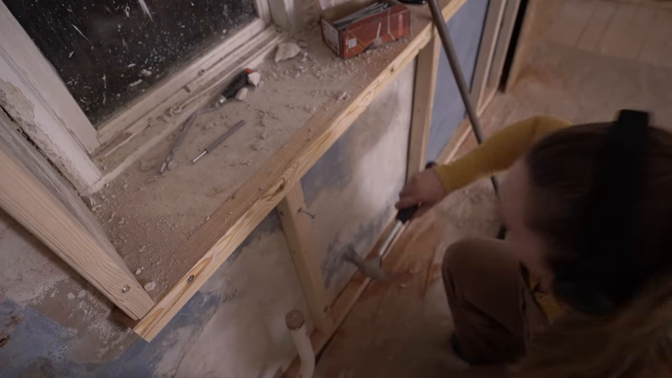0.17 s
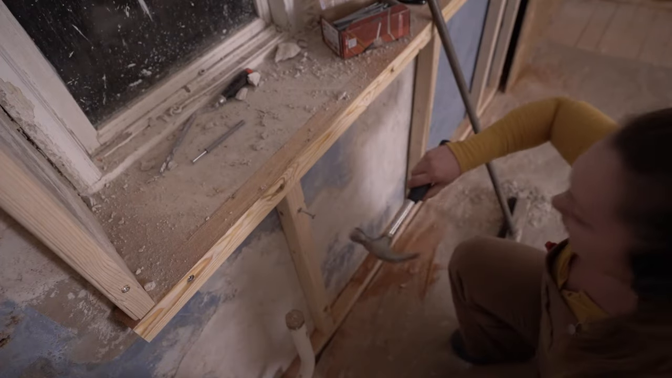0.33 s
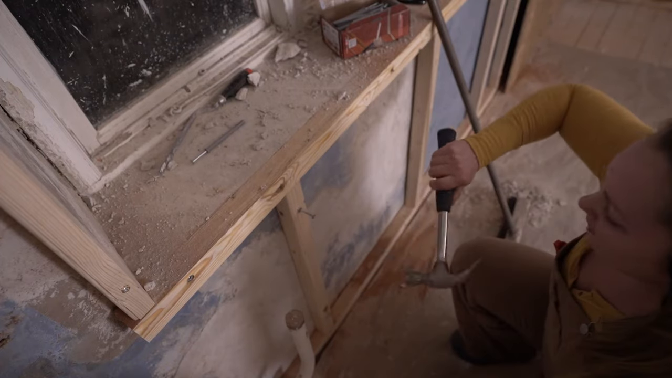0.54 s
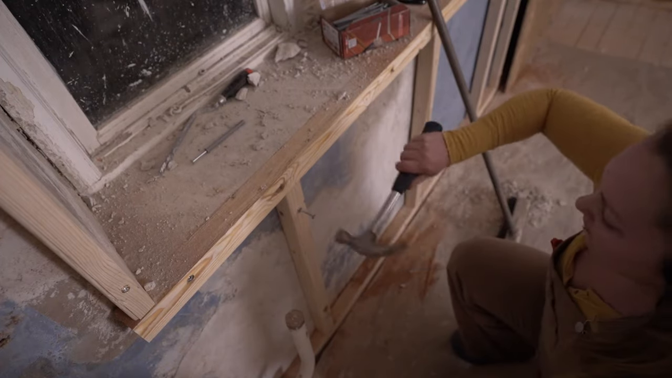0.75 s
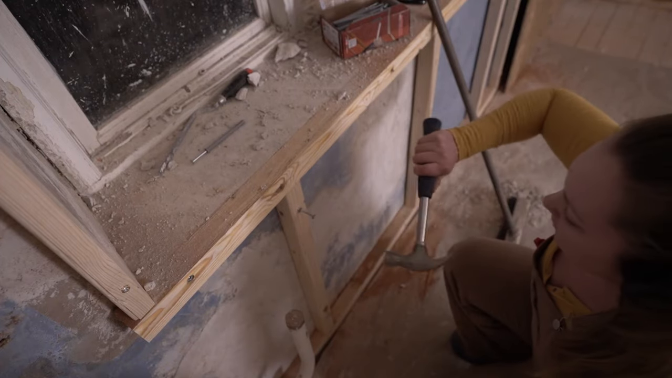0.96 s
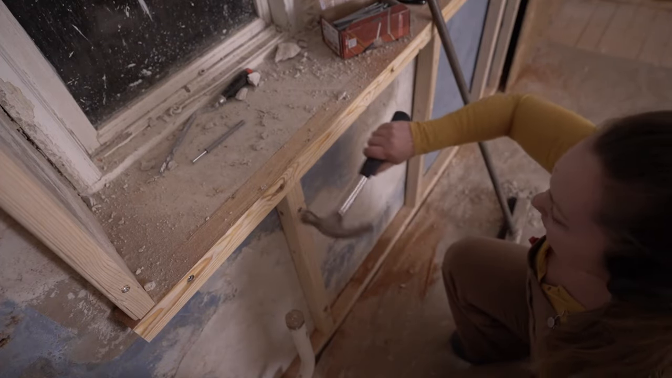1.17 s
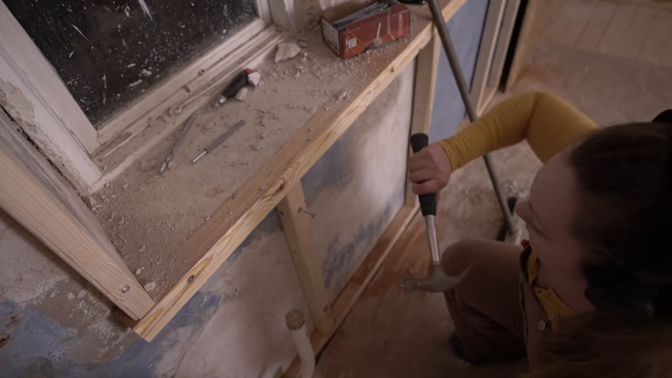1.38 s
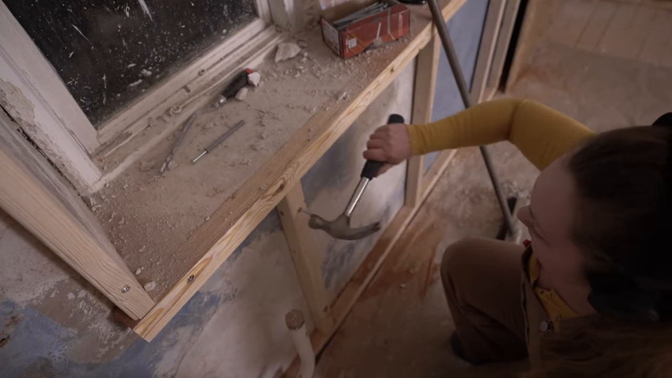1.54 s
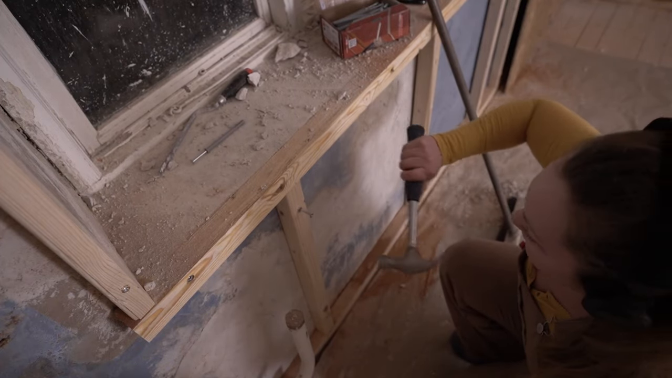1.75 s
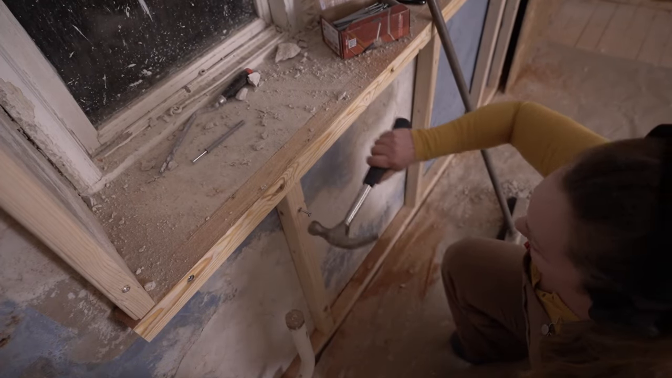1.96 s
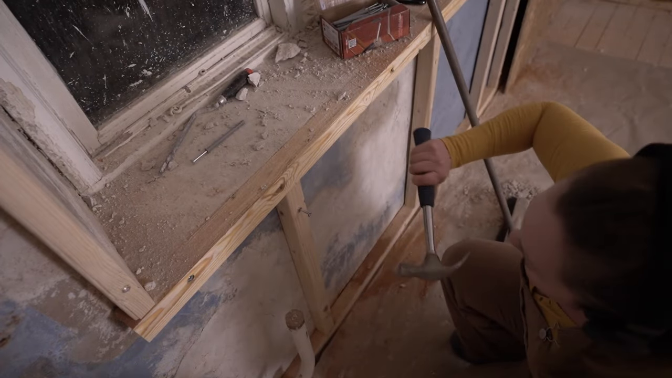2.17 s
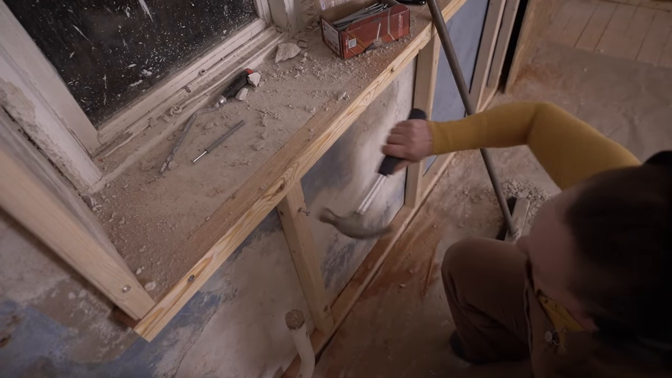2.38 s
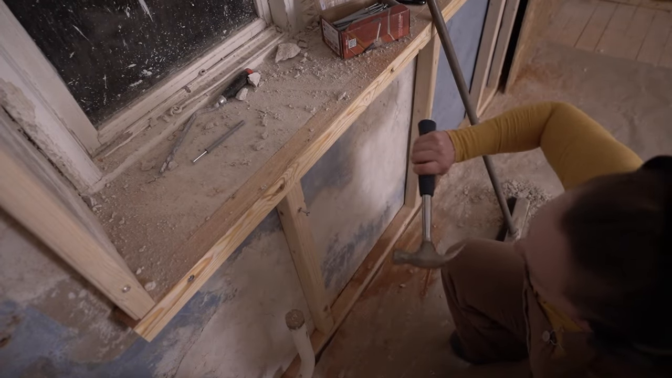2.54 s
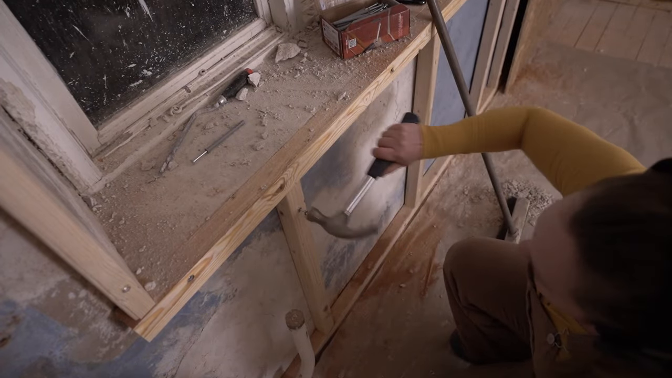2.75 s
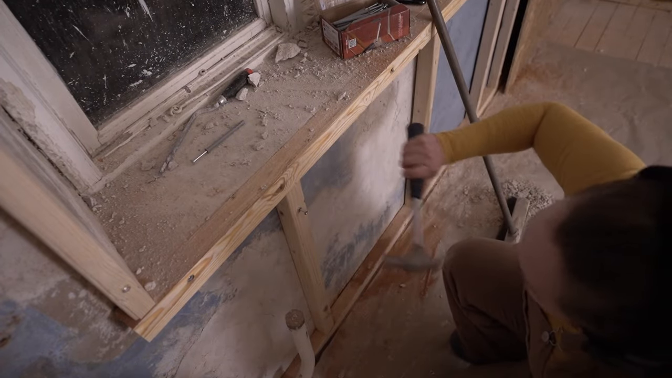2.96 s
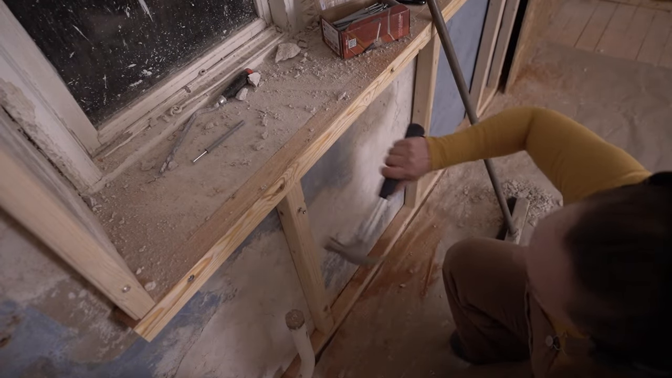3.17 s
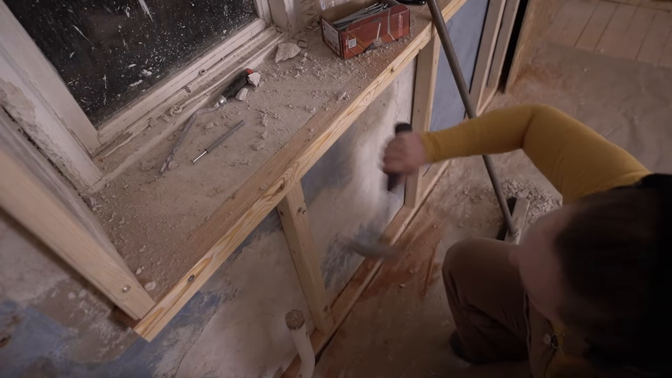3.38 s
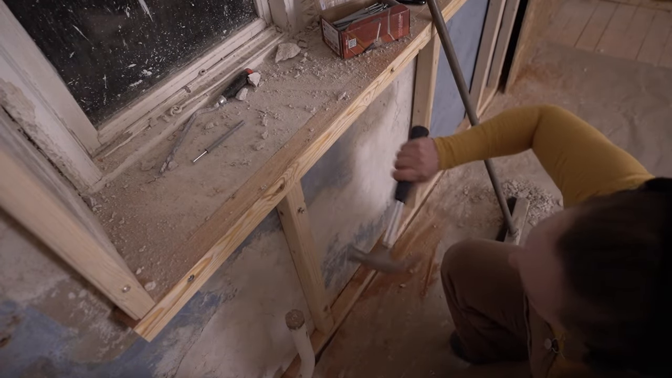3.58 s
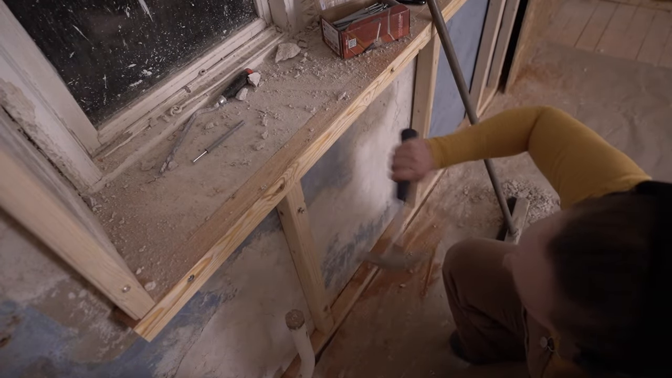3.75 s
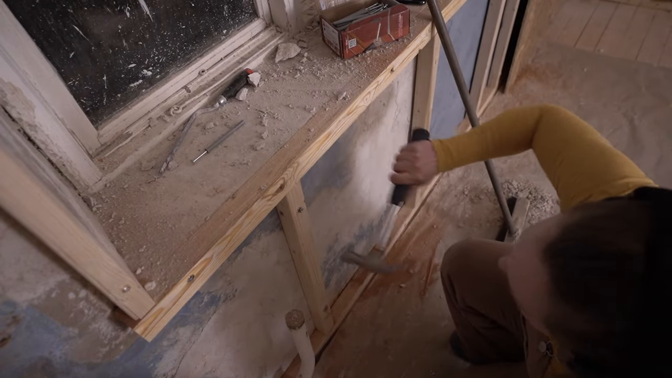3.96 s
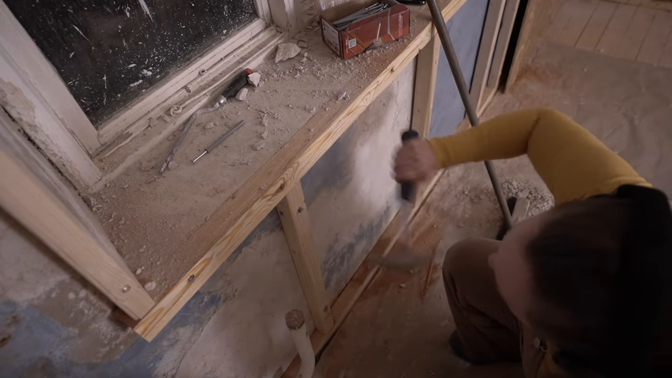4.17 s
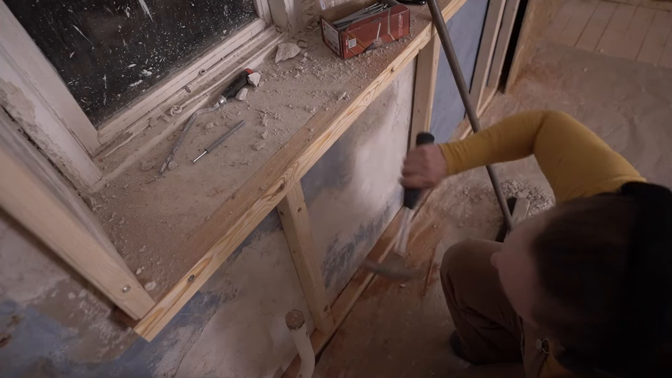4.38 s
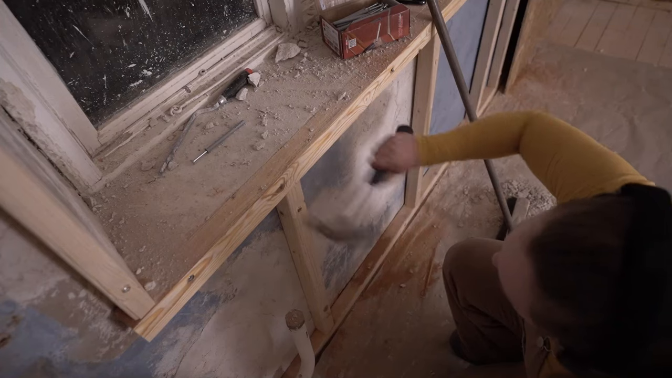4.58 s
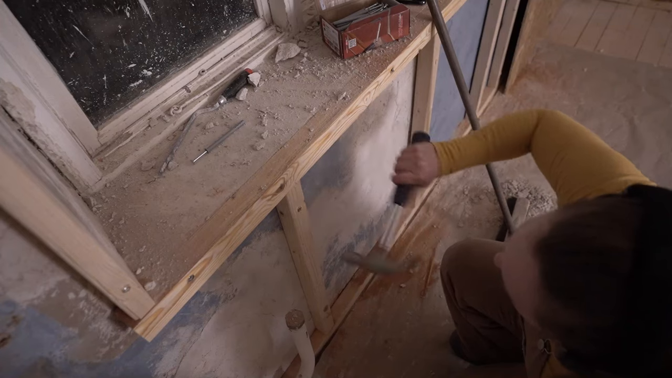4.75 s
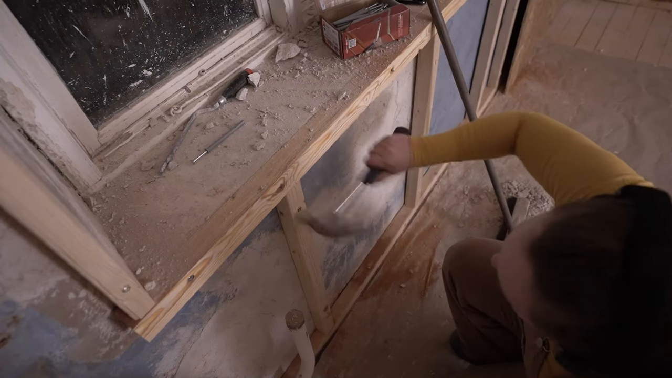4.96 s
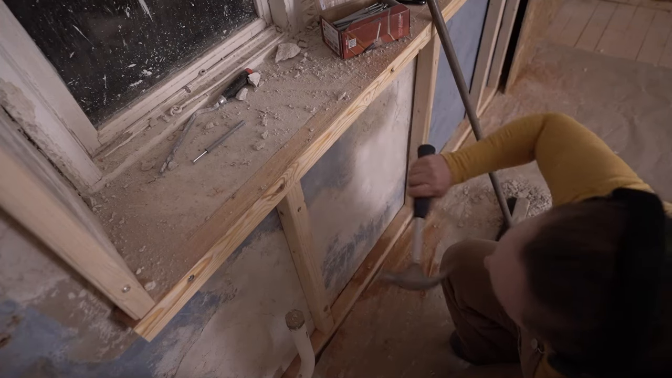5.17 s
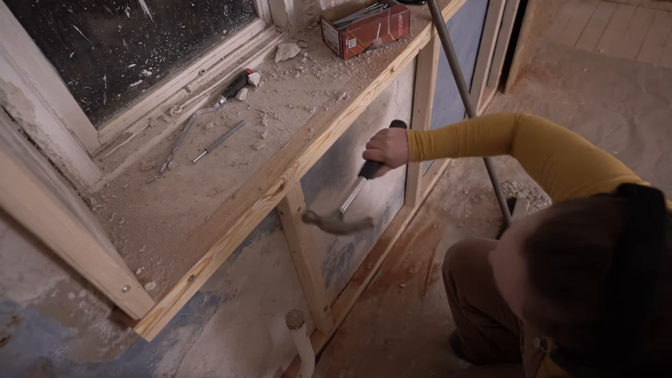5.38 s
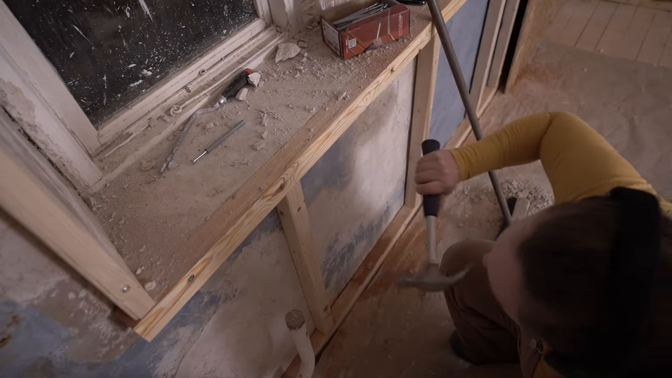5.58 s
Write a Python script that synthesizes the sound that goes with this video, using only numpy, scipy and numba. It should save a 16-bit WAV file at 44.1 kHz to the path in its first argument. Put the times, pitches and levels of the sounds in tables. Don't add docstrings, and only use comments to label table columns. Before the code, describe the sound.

One hammer on nails in a timber batten, indoors among hard walls. First quiet shifting of clothes, a tick and a low floor groan; then a quick bouncing tap and eleven regular strikes about 0.38 seconds apart. Each is a sharp knock with metallic ring and short room echo; later ones are fuller. Tiny crumbs tick between blows. Close microphone, peaks squashed, low room tone.

```python
import sys
import numpy as np
from scipy import signal
from scipy.fft import rfft, irfft, next_fast_len
from scipy.io import wavfile
from scipy.ndimage import uniform_filter1d, minimum_filter1d
from numba import njit

SR = 44100
rng = np.random.default_rng(int(sys.argv[2]) if len(sys.argv) > 2 else 0)


def file_out(sig):
    cols = np.atleast_2d(sig).T
    lim = np.clip(cols, -1, 1)
    pcm = np.round(lim * 32767).astype(np.int16)
    wavfile.write(sys.argv[1], SR, pcm)


def ratio_of_db(decibels):
    return 10 ** (np.asarray(decibels, float) / 20)


N = 247842
TAIL = 2 ** 15
T = np.arange(TAIL) / SR
DELAY_S = 0.000964
BOUNCE_S, USUAL_DB = 0.05, -17


def fade(t60, size=TAIL):
    return np.exp(-np.log(1000) * T[:size] / t60)


def ring(modes, spread=0., size=TAIL // 4):
    out = np.zeros(size)
    for hz, db, t60 in modes:
        louder, sharper = spread * rng.standard_normal(2)
        sine = np.sin(2 * np.pi * hz * (1 + 0.0017 * sharper) * T[:size])
        out += ratio_of_db(db + louder) * sine * fade(t60, size)
    return out


def curve(table, x, column=1):
    table = np.array(table)
    return np.interp(np.log(x), np.log(table[:, 0]), table[:, column])


def coloured(size, spectrum):
    n = next_fast_len(size, True)
    hz = np.maximum(np.fft.rfftfreq(n, 1 / SR), 1)
    x = irfft(rfft(rng.standard_normal(n)) * ratio_of_db(curve(spectrum, hz)), n)[:size]
    return x / x.std()


def add(bus, s, x):
    i = int(s * SR)
    bus[i:i + len(x)] += x[:N - i]


def walk(rate):
    k = int(SR / rate)
    steps = np.repeat(rng.standard_normal(N // k + 1), k)
    return 1.2 * uniform_filter1d(uniform_filter1d(steps, k), k)[:N]


# [t/s, level/dB, wood knock f/Hz, face ping level/dB against the blow, steel ring level/dB]
BLOWS = [(1.15, -25, 1582, 1.5, 8.5), (1.172, -17, 1376, -36, -9), (1.579, -23.5, 1540, -28, 11),
         (1.948, -22.5, 1333, -25, 4), (2.324, -18, 1558, -13, 11.5), (2.706, -17, 1607, -28.5, 6),
         (3.081, -18, 1633, -54, 7), (3.464, -17, 1850, -29, 7), (3.84, -17, 1385, -19, 4.5),
         (4.261, -14.5, 1607, -23.5, 12), (4.64, -10.5, 1705, -25.5, 4), (5.012, -8.5, 1773, -21, 5),
         (5.402, -8, 1352, -29, -1)]


def hammering():
    near, far = np.zeros(N), np.zeros((3, N))
    bounces = np.diff(np.array(BLOWS)[:, 0], prepend=0) < BOUNCE_S
    for (s, db, knock_hz, ping_db, steel_db), bounce in zip(BLOWS, bounces):
        direct, wet = blow(db, knock_hz, ping_db, *colour(s, db, steel_db, bounce))
        add(near, s + DELAY_S, direct)
        blend = rng.standard_normal(len(far))
        for bus, share in zip(far, blend / np.linalg.norm(blend)):
            add(bus, s + DELAY_S, share * wet)
    return near, far


# [level/dB, gain as the joint closes/dB, share of the steel's ring]
WAKE = [(4.5, -5, -0.076), (-7, 10, -0.47), (5, -0.5, .3), (0.1, 1.2, 1), (2, -1, 0.11), (-4, 4, 0),
        (7, -8, 0), (0.5, 0, .05), (1, 0, -0.16), (-4, 7, 0.071), (-2, 2, .05)]


def colour(s, db, steel_db, bounce):
    since = s - BLOWS[0][0]
    closed = since / (BLOWS[-1][0] - BLOWS[0][0])
    harder = db - USUAL_DB
    head_db = -25 + 0.98 * steel_db + 9.5 * closed
    thud_db = -24.5 + 16 * closed + 10 * (since < BOUNCE_S) - db
    splinter_db = 3.5 + 0.02 * harder
    tilt = -5.5 if bounce else 1.06 - 0.12 * harder + 0.0524 * steel_db
    boom_db = -14.5 - 15.5 * np.exp(-since / 0.71) - db
    wake_db = [base + gain * closed + share * steel_db for base, gain, share in WAKE]
    return head_db, thud_db, splinter_db, tilt, boom_db, wake_db


# [f/Hz, level/dB, t60/s]
HEAD_MODES = [(2525, -4, 0.025), (2740, -11, 0.045), (3206, 1.5, 0.12), (3350, -4.5, .04),
              (3320, -4.5, 0.049), (4360, -11, 0.026), (6650, -17, 0.012)]
# [f/Hz, level/dB, t60/s]
FACE_MODES = [(9200, 5.5, 0.015), (8570, -12, 0.028), (9500, -16.5, 0.012)]
# [f/Hz, level/dB, t60/s]
BATTEN_MODES = [(172, -13.5, .05), (219, 5.5, 0.031), (307, -2.5, 0.1), (452, 12, 0.0092), (620, -1, .03)]
# [f/Hz, level/dB, t60/s]
FLOOR_MODES = [(51.65, -7.5, .1), (63.6, -4, 0.66), (79, -4, 0.055), (111.4, -11.5, 0.18)]


def blow(db, knock_hz, ping_db, head_db, thud_db, splinter_db, tilt, boom_db, wake_db):
    knock_modes = [(knock_hz, 0, 0.045), (knock_hz * 1.22, -4, 0.035), (knock_hz * 0.91, -6, 0.04)]
    knock = ring(knock_modes, spread=1.0)
    size = len(knock)
    shock = ratio_of_db(splinter_db) * jolt(tilt, boom_db, wake_db)
    grains = rng.standard_normal(size) * fade(0.035, size)
    crack = signal.fftconvolve(shock, grains)[:size]
    ping = ratio_of_db(ping_db + 4) * ring(FACE_MODES, spread=0.7)
    click = ratio_of_db(-25.5 + min(tilt + 2, 0)) * rng.standard_normal(size) * fade(0.006, size)
    head = ratio_of_db(head_db - 8) * ring(HEAD_MODES, spread=0.87)
    thud = ratio_of_db(thud_db - 18) * ring(BATTEN_MODES, spread=0.8)
    thud += ratio_of_db(boom_db - 24) * ring(FLOOR_MODES, spread=0.8)
    push = 1 - np.exp(-T[:size] / 0.0025)
    near = push * (knock + ratio_of_db(5) * thud) + ratio_of_db(-2.5) * crack + ping + click + ratio_of_db(3) * head
    far = ratio_of_db(-17.5) * knock + ratio_of_db(21) * shock + ratio_of_db(-11.5) * ping + head + thud
    drive = ratio_of_db(db + 1)
    return drive * near, drive * far


# [f/Hz, level/dB per Hz]
CRACK = [(40, -12), (150, -5), (500, -8.5), (1000, -4), (1800, 1.5), (3000, -9), (4500, -20.5),
         (6700, -20.5), (9000, -32), (12000, -38.5), (16500, -51.5)]
# [f/Hz, half width/Hz]
PEAKS = [(1355, 70), (2200, 260), (2556, 99), (3424, 140), (5230, 190), (7600, 500), (9800, 230),
         (6260, 350), (1000, 160), (3030, 110), (12500, 1400)]
# [f/Hz, half width/Hz, share]
STEEL = [(1900, 260, 0.18), (3000, 120, -0.32), (4000, 78, -0.011), (4275, 110, 0.89), (4730, 86, -0.48),
         (6000, 39, 0.33), (6620, 110, 0.11), (8900, 600, 0.39)]


def jolt(tilt, boom_db, wake_db):
    hz = np.maximum(np.fft.rfftfreq(TAIL // 4, 1 / SR), 20)
    db = curve(CRACK, hz)
    db = db + boom_db * np.clip(np.log2(220 / hz), 0, 1)
    db = db + tilt * np.log2(np.maximum(hz / 1500, 1))
    bumps = [(f, width, lift_db) for (f, width), lift_db in zip(PEAKS, wake_db)]
    bumps += [(f, width, share * wake_db[3]) for f, width, share in STEEL]
    for f, width, lift_db in bumps:
        db = db + lift_db * np.exp(-0.5 * ((hz - f) / width) ** 2)
    cepstrum = irfft(np.log(ratio_of_db(db)))
    cepstrum[1:TAIL // 8] *= 2
    cepstrum[TAIL // 8 + 1:] = 0
    pulse = irfft(np.exp(rfft(cepstrum)))
    return pulse / np.sqrt(np.sum(pulse ** 2))


# [t/s, level/dB, f/Hz]
NAIL = [
    (1.5, -45, 824),
    (2.35, -39, 843),
    (2.7, -34, 850),
    (3.1, -37.5, 843),
    (3.85, -43, 848),
    (4.25, -59, 980),
    (4.65, -34.5, 985),
    (5.4, -31, 1002),
]


def nail():
    out = np.zeros(N)
    at, level_db, pitch_hz = np.transpose(NAIL)
    beat = 1 + 0.9 * np.cos(2 * np.pi * 21 * T)
    for s, *_ in BLOWS:
        mode = (np.interp(s, at, pitch_hz), np.interp(s, at, level_db), 0.44)
        add(out, s + DELAY_S, beat * ring([mode], size=TAIL))
    return out


# [t/s, level/dB, f/Hz, t60/s]
TICKS = [(.039, -69, 8000, 0.0037), (.146, -54, 2100, .008), (0.18, -42, 1330, 0.014),
         (.183, -43.5, 2200, 0.0055), (0.185, -50, 4000, 0.003), (.184, -66, 8000, .004),
         (.238, -58, 1450, 0.013), (.317, -51, 3000, 0.0045), (.318, -61, 8000, .004),
         (4.552, -62.5, 9000, 0.0038), (5.281, -64, 9000, 0.0034), (5.347, -72, 6000, 0.0041),
         (5.556, -64, 8400, 0.0023), (5.612, -66, 9000, 0.0025)]


def ticks():
    out = np.zeros(N)
    for s, db, hz, t60 in TICKS:
        add(out, s, ring([(hz, db, t60)], size=TAIL))
    return out


def chatter():
    band = coloured(TAIL, [(1280, -40), (1380, -4), (1480, 0), (1540, -40)])
    return ratio_of_db(-71) * band * fade(5) * np.minimum(1, T[::-1] / 0.12)


# [t/s, level/dB]
GRIT = [
    (1.788, -74),
    (4.196, -68.5),
    (4.553, -62.5),
    (4.615, -68),
    (5.281, -70),
]


def grit():
    bright = [(3000, -26), (7000, 2), (12000, -4.5), (16500, -6.5)]
    out, shaken = np.zeros(N), np.zeros(N)
    for s, db in GRIT:
        add(out, s, ratio_of_db(db) * coloured(256, bright) * fade(0.005, 256))
    for s, *_ in BLOWS:
        add(shaken, s, fade(3) ** 2)
    return out + ratio_of_db(-92) * coloured(N, bright) * np.sqrt(shaken)


# [middle t/s, half length/s, cloth level/dB, hiss level/dB against cloth, floor groan level/dB]
RUSTLE = [
    (0.21, .025, -71, -16, -70),
    (.29, 0.07, -70.5, -9, -61),
    (0.53, 0.048, -77.5, -3.5, -71),
    (.5, .25, -78.5, -14, -68),
    (0.98, .09, -81, -22.5, -62.5),
]


def rustle():
    s, half, cloth_db, hiss_db, groan_db = np.transpose(RUSTLE)[..., None]
    size = int(1.3 * SR)
    swell = np.exp(-((np.arange(size) / SR - s) / half) ** 2)

    def level(db):
        return np.sqrt(np.sum(ratio_of_db(db) ** 2 * swell, axis=0))

    low = coloured(size, [(500, -29), (1100, 2), (4000, 1.5), (7000, -28)])
    high = coloured(size, [(3000, -35), (5500, 0.5), (8300, -0.5), (11000, -11.5), (16000, -20.5)])
    groan = coloured(size, [(20, 6), (75, 4), (250, -8.5), (600, -45.5)])
    cloth = low * level(cloth_db) + high * level(cloth_db + hiss_db)
    grain = ratio_of_db(1.5 * walk(150)[:size])
    return cloth * grain + groan * level(groan_db)


# [f/Hz, t60/s, level/dB]
ROOM = [(50, 0.98, 2.5), (106.3, 0.88, -3.5), (280, 0.62, -1.5), (740, 0.5, 1.5), (1900, 0.49, -8.5),
        (5000, 0.37, 3), (9000, 0.31, -3), (13900, 0.26, -11.5)]


def walls():
    noise = rfft(rng.standard_normal(TAIL))
    f = np.fft.rfftfreq(TAIL, 1 / SR)
    early = 1 + ratio_of_db(-5) * fade(0.31)
    out = np.zeros(TAIL)
    for hz in 35 * 2 ** np.arange(0, 9, 1 / 3):
        share = np.clip(1 - 3 * abs(np.log2(f / hz + 1e-9)), 0, 1)
        rise = 1 - np.exp(-(T / (0.00073 + 2.4 / hz)) ** 2)
        band = irfft(noise * share, TAIL) * rise * early * fade(curve(ROOM, hz))
        out += ratio_of_db(curve(ROOM, hz, column=2)) * band
    return out / np.sqrt(np.sum(out ** 2))


# [f/Hz, level/dB per Hz]
AIR = [(20, 5.5), (60, -5), (170, -17), (330, -9), (700, -18.5), (1500, -22), (3000, -32.5), (4800, -38),
       (6000, -45.5), (10000, -57.5), (16500, -71.5)]


def air():
    return ratio_of_db(-59.5) * coloured(N, AIR) * ratio_of_db(0.55 * walk(36))


def scene():
    near, far = hammering()
    shank, knocks = nail(), ticks()
    near += shank + knocks
    far[0] += ratio_of_db(-7) * shank + ratio_of_db(3) * knocks
    add(near, 0.19, chatter())
    add(near, 0, rustle())
    echo = sum(signal.fftconvolve(bus, walls())[:N] for bus in far)
    return (near + ratio_of_db(-5.5) * echo + grit() + air())[None]


@njit
def follow(x, release):
    e, y = 1e-9, np.empty(len(x))
    for i in range(len(x)):
        e = max(x[i], e * release)
        y[i] = e
    return y


def band_limit(x):
    return signal.sosfilt(signal.butter(12, 16830, fs=SR, output="sos"), x)


def record(dry):
    limit_db, release_s, ratio, ceiling = -15, 0.035, 4.2, 0.19
    dry = signal.sosfilt(signal.butter(2, 45, "high", fs=SR, output="sos"), dry)
    ahead = -minimum_filter1d(-abs(dry[0]), size=45)
    peak = follow(ahead, np.exp(-1 / (release_s * SR)))
    gain = np.minimum(1, ratio_of_db(limit_db) / peak) ** (1 - 1 / ratio)
    held = dry * uniform_filter1d(gain, size=21)
    held = held / (1 + (held / ceiling) ** 6) ** (1 / 6)
    top = signal.ellip(8, 0.2, 70, 16000, fs=SR, output="sos")
    return band_limit(signal.sosfilt(top, held))


dry = scene()
out = record(dry)
file_out(out)
```